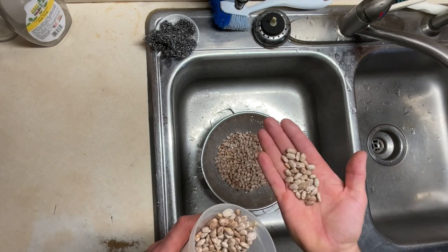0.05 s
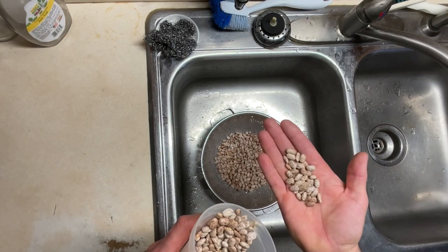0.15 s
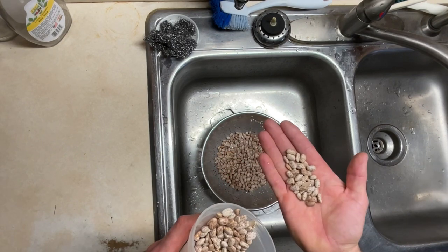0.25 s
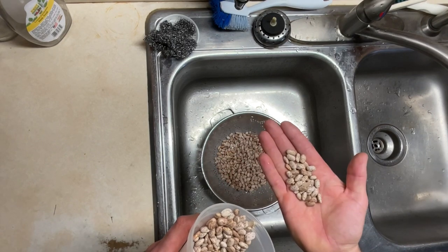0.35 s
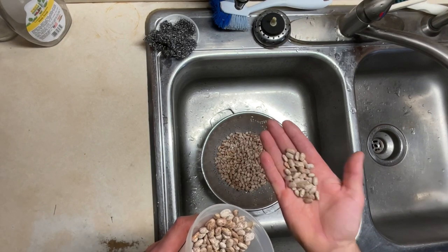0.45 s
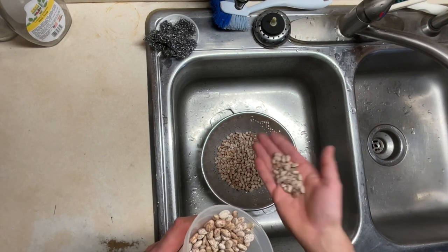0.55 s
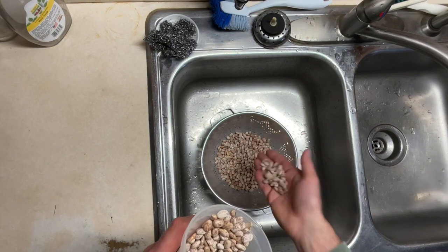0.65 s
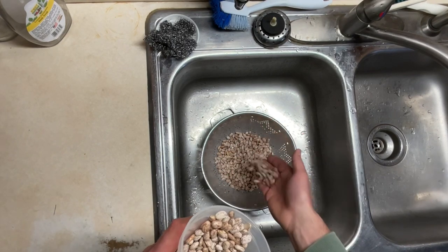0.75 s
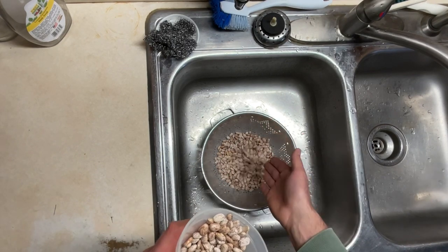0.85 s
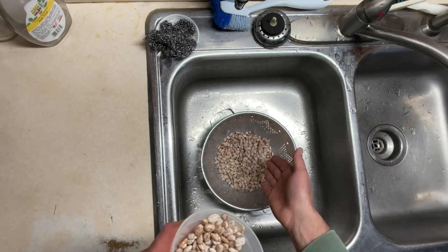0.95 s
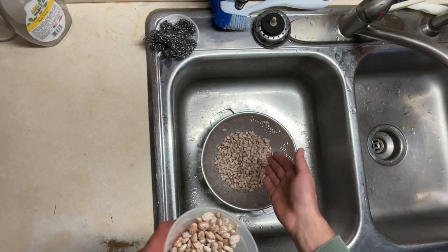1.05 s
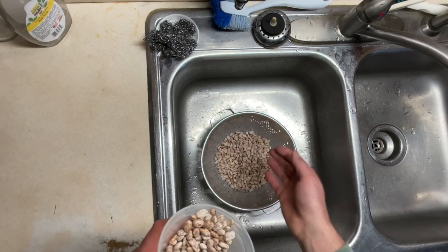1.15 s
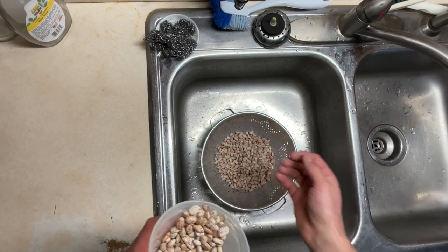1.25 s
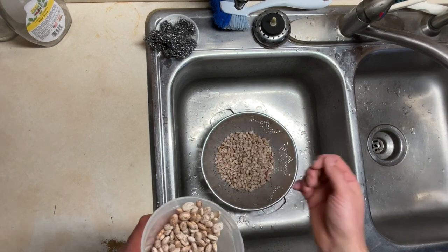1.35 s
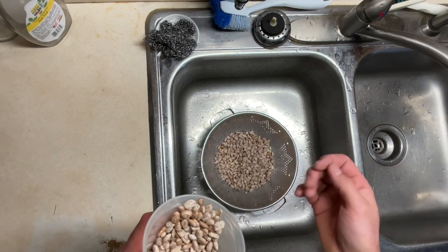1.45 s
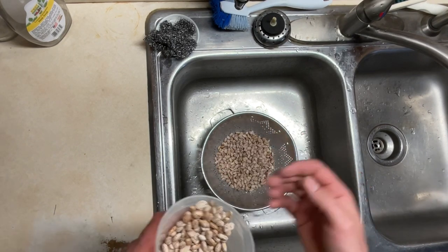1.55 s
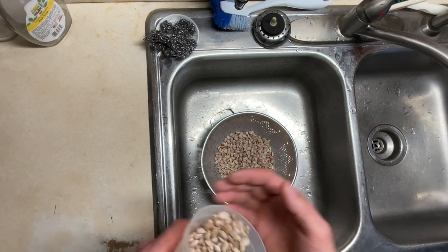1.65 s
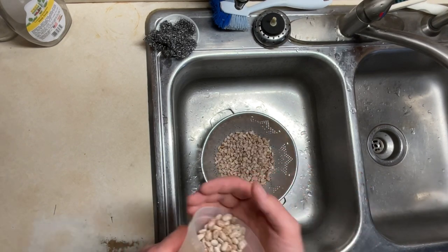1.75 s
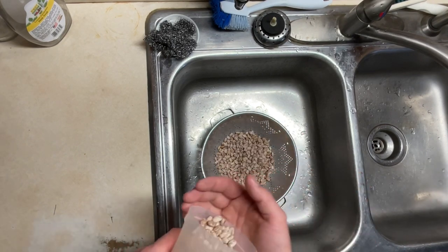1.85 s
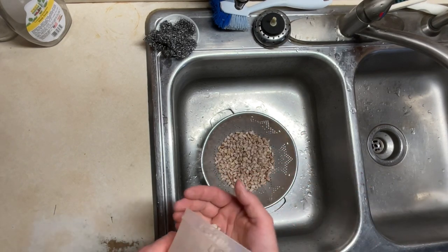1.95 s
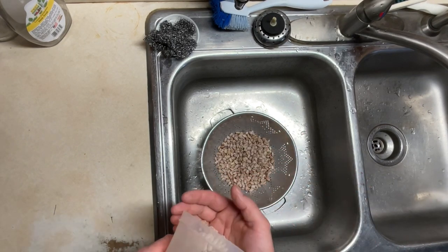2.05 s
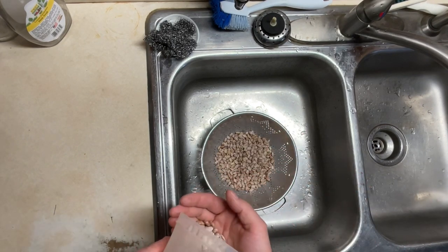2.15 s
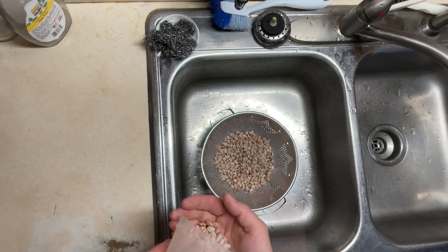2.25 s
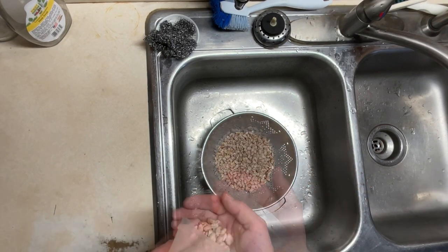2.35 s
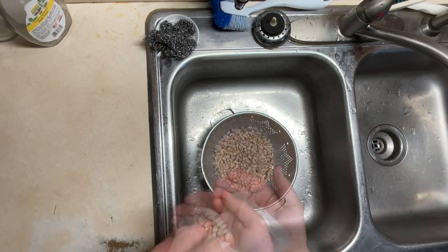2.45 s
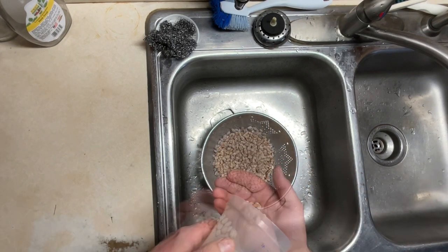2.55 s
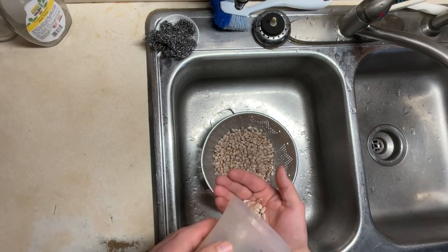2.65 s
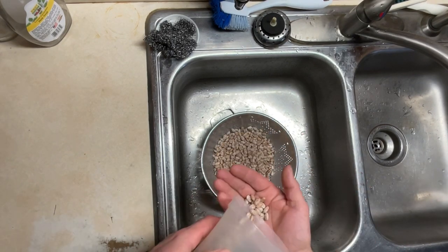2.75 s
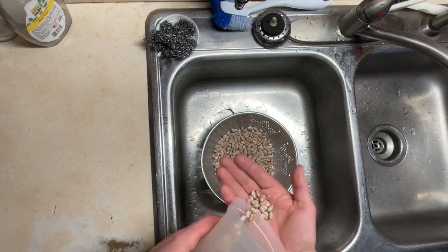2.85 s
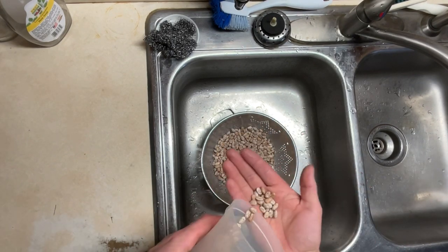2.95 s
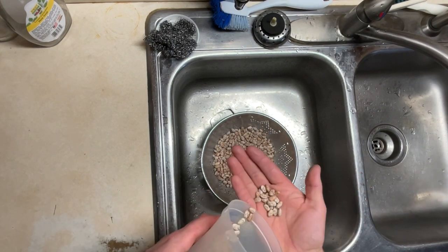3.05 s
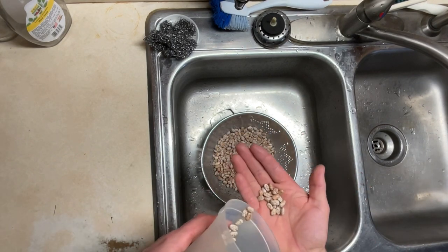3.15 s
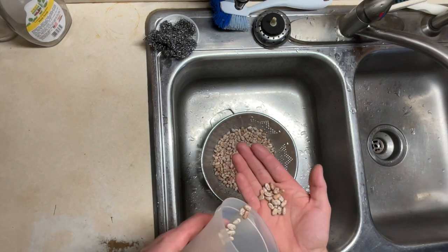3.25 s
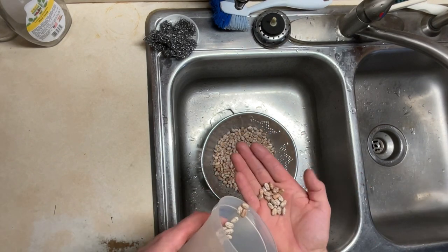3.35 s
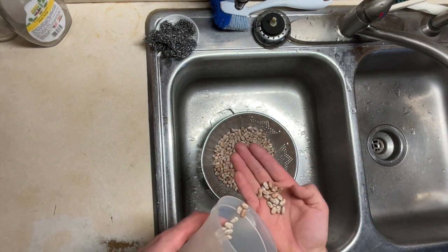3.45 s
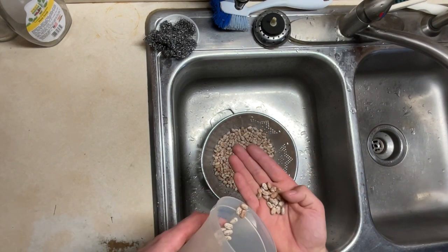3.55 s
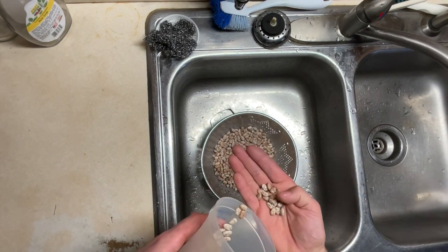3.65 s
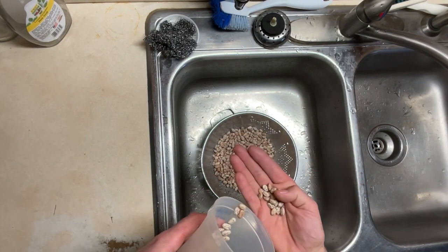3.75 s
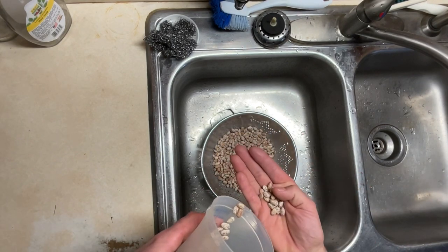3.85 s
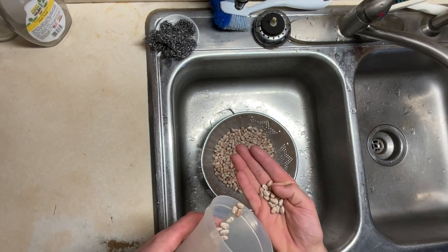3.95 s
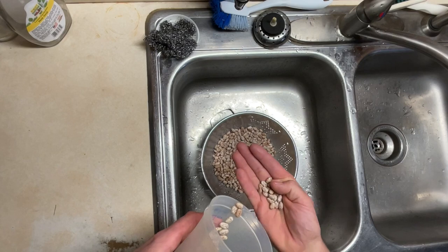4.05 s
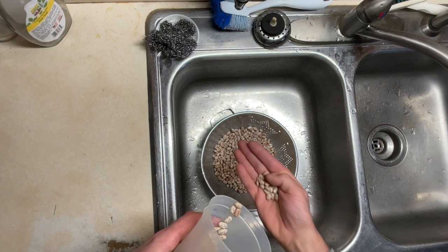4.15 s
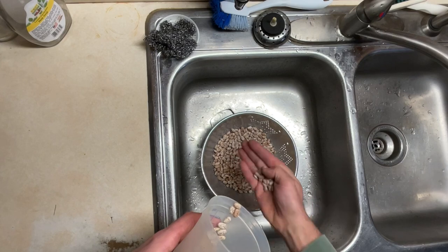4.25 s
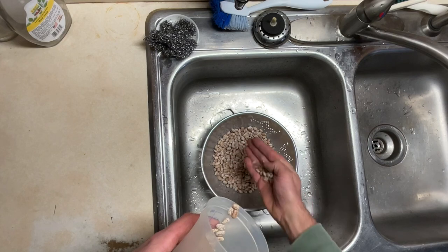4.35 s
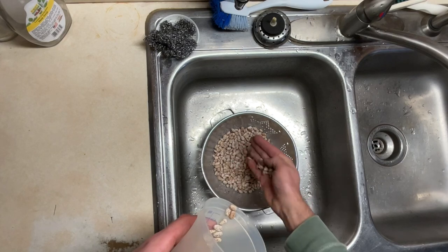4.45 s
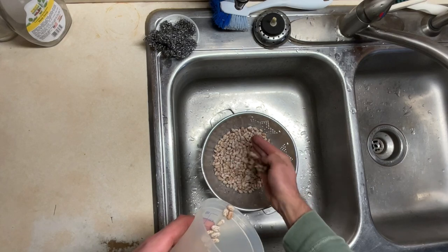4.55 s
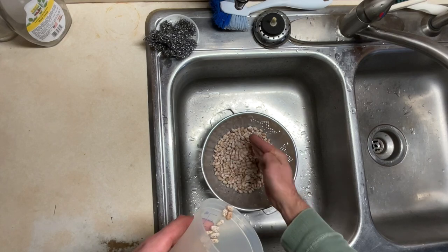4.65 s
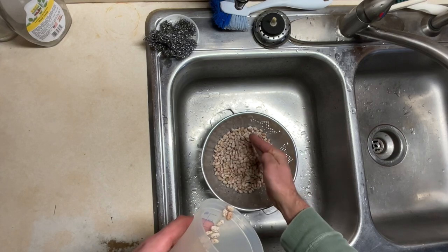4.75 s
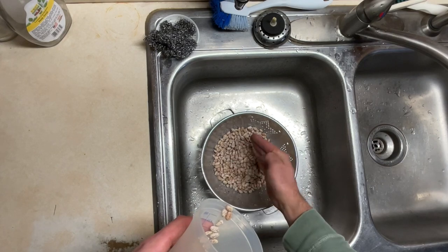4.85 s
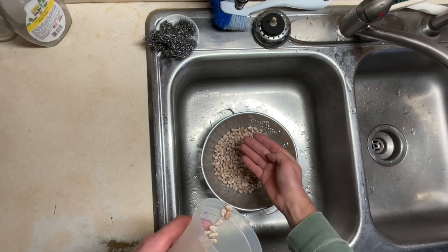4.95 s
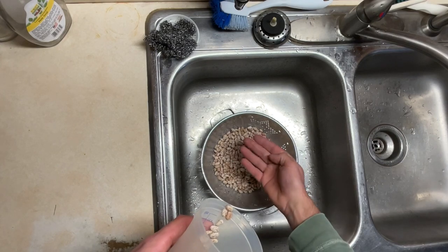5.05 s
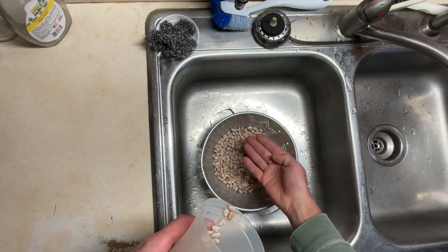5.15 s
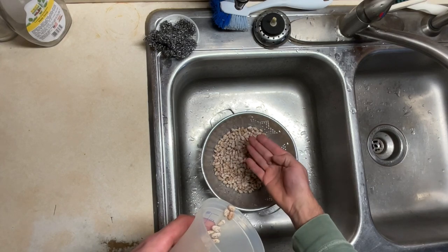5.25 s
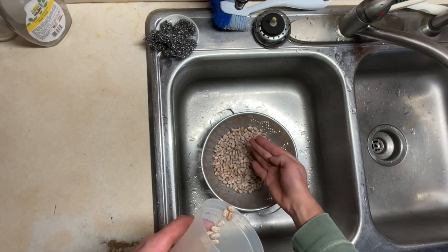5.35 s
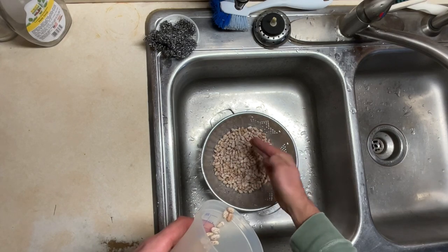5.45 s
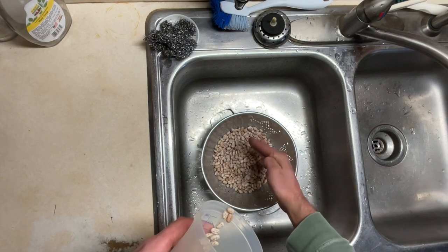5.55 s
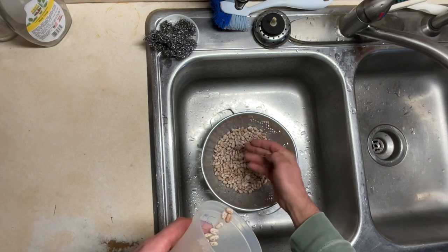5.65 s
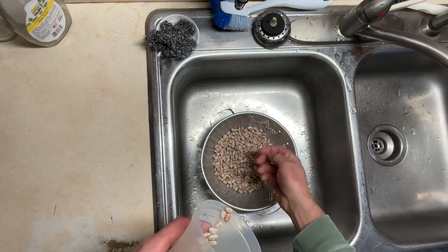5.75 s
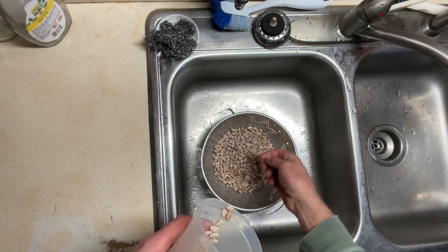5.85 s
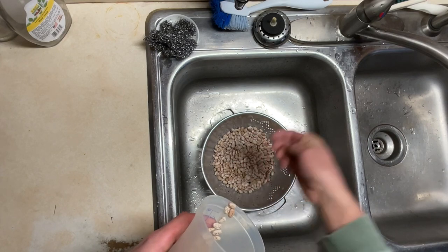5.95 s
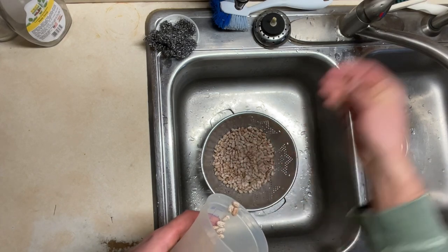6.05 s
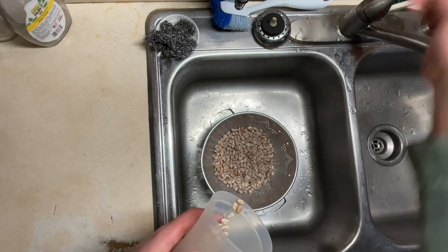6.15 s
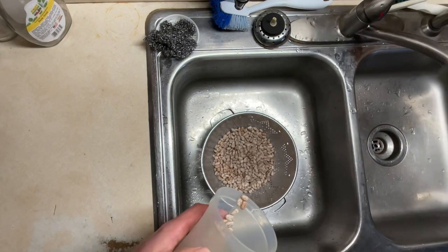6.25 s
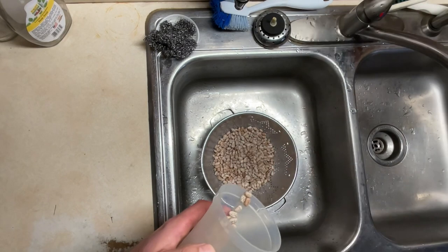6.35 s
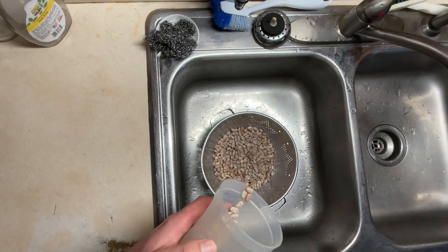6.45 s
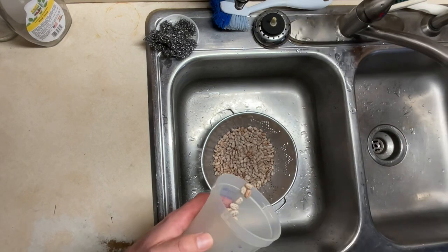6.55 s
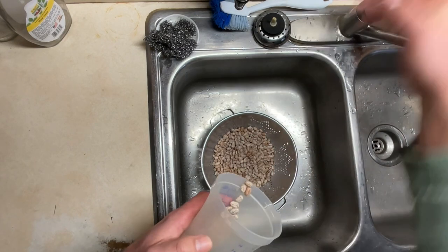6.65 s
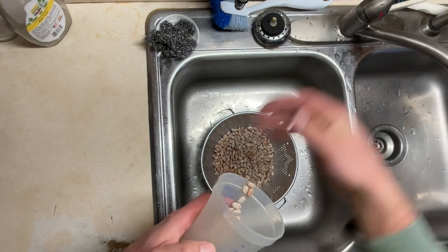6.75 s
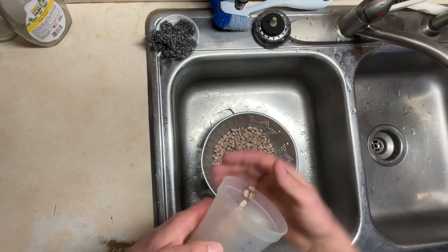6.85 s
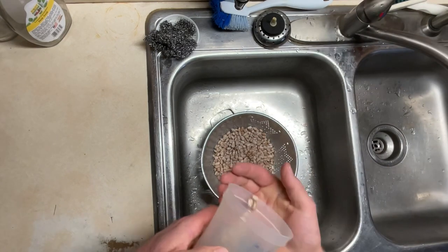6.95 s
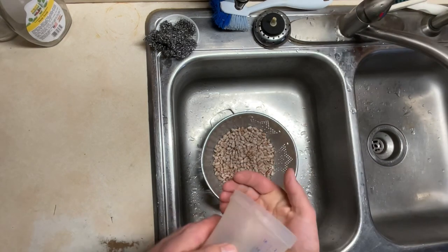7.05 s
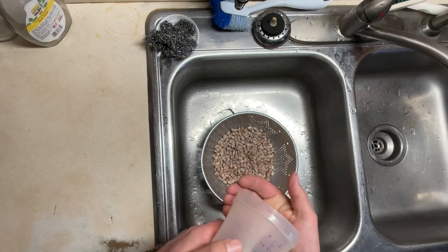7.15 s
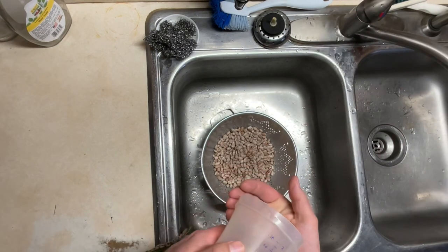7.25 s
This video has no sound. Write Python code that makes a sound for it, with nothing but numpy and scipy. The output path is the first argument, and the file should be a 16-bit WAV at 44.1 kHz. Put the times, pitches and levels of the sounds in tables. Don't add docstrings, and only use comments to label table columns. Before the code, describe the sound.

A close stereo kitchen scene with a quiet, low fridge hum, faint fan tone and nearly inaudible tap drips throughout. After about half a second, the first dry beans tick down, swelling by 0.8 to 0.95 s into a loud, bright clatter on beans and metal colander, with thin rim ringing and a dull boom from the steel sink. Single sharp clicks thin out by 1.2 s. From 1.6 to 2.8 s beans slide and tick more softly against a plastic tub and palm, slightly muffled, then clearer. A near-quiet stretch holds faint finger rubs around 3.8 and 4.1 s. At 4.5 to 4.8 s a smaller, softer handful patters into the colander; stray ticks follow near 5.5 s. Around 6.2 s the tub is rubbed, with a low bump and sharp hollow rap near 6.45 s, then light bean ticks and dull handling until about 7.3 s.

```python
import sys
import numpy as np
from scipy import signal
from scipy.fft import rfft, irfft
from scipy.io import wavfile

SR = 44100
rng = np.random.default_rng(int(sys.argv[2]) if len(sys.argv) > 2 else 0)


def transcribe(signal):
    frames = np.atleast_2d(signal).T
    limited = np.clip(frames, -1, 1)
    pcm = np.round(limited * 32767).astype(np.int16)
    wavfile.write(sys.argv[1], SR, pcm)


def nominal_scale(level):
    x = np.asarray(level, float) / 20
    return 10 ** x


N = 321489

# start in s, peak in dB, tick pitch in Hz,
# sink boom relative to the tick in dB.
FIRST_DROP = [(.5296, -60.5, 5270, -6), (.5746, -52.5, 8750, -9), (.615, -35.5, 10900, -34),
              (.64, -43, 9060, -30), (.6866, -38, 11300, -29), (.705, -36, 8200, -36),
              (.7577, -35, 11100, 0), (.7712, -28, 10600, -13), (.7792, -27, 8960, -12),
              (.7902, -21, 11300, -10), (.799, -25, 8000, -12), (.8077, -19, 12300, -14),
              (.82, -26, 9000, -10), (.8373, -17, 8680, -12), (.8455, -26, 7000, -16),
              (.854, -27, 6000, -14), (.8637, -20, 11200, -19), (.872, -25, 5000, -18),
              (.8805, -16, 7400, -19.5), (.887, -25, 7500, -25), (.8945, -10.5, 6790, -22),
              (.9084, -8.5, 7290, -32.5), (.918, -24, 6500, -30), (.926, -23, 11000, -30),
              (.9327, -9, 6700, -33.5), (.9335, -20, 12000, -30), (.942, -21, 6300, -30),
              (.965, -31, 8000, -20), (.9737, -24, 7710, -19), (1.0011, -13, 7400, -26),
              (1.0521, -15.5, 7480, -40), (1.096, -11.5, 7630, -41.5), (1.1755, -36, 7430, -17)]
SECOND_DROP = [(4.4668, -58, 2980, -4), (4.4938, -41, 9100, -3.5), (4.5013, -41, 9100, -10),
               (4.5135, -27, 10040, -7), (4.53, -36, 8000, -8), (4.545, -40, 8500, -5),
               (4.573, -23, 11300, -8), (4.588, -32, 6500, -8), (4.5984, -31, 6620, -19),
               (4.6194, -27, 7450, -31), (4.633, -27, 7000, -12), (4.6538, -26, 6840, -9),
               (4.662, -30, 6500, -12), (4.68, -32, 6500, -10), (4.7173, -40, 7100, -8),
               (4.7386, -30.5, 11000, -5), (4.7992, -47.5, 6400, 3.5), (4.9186, -57.5, 3100, 6.5),
               (5.527, -36, 11500, 6), (5.624, -36, 11500, -5), (5.696, -53.5, 5870, 0)]
# start in s, peak in dB, tick pitch in Hz,
# wall knock relative to the tick in dB.
POUR = [(1.8769, -47, 5560, -5), (1.885, -42, 5000, -3), (1.927, -33, 7070, -8), (2.0127, -45, 6260, 4.5),
        (2.0325, -33, 5910, -27), (2.085, -27, 6530, -11.5), (2.1474, -40, 6540, -24),
        (2.1581, -32, 6200, -11), (2.1986, -42, 2150, -18.5), (2.289, -42, 7500, -10),
        (2.3145, -43.5, 6530, -10), (2.3724, -43, 9010, -23), (2.397, -42, 7000, -23),
        (2.4276, -38, 5900, -9), (2.4547, -38, 9400, -14), (2.4986, -39, 6140, -10),
        (2.53, -33.5, 7470, -6), (2.547, -38, 9000, -8), (2.566, -40, 6000, -12), (2.5835, -32, 6240, -24),
        (2.6195, -36, 6660, -13), (2.6864, -44, 4450, -13), (2.7235, -54, 2190, -17),
        (2.746, -48, 7400, -16), (2.7819, -59, 3300, -16.5), (2.8992, -58, 2170, -4),
        (2.9236, -54.5, 2224, -9), (2.986, -55, 3010, -23)]
FINGERING = [(1.5677, -59, 7180, -10), (1.5971, -65, 4600, -14.5), (1.656, -60, 5850, -12),
             (1.6684, -58.5, 6050, -15.5), (1.6939, -52, 5510, -11.5), (1.7274, -47.5, 5600, -23),
             (1.8061, -63.5, 3330, -15.5), (3.6931, -62, 4060, -13), (3.8104, -63, 7770, 8),
             (3.8193, -62, 2700, 6), (4.1226, -55, 2930, 10), (4.137, -53, 2000, 8),
             (4.1431, -50, 3590, -6), (4.298, -52, 7710, -23.5), (4.39, -71, 2010, -8),
             (4.4165, -60, 9140, -17.5)]
REFILL = [(6.1961, -48, 2180, -8), (6.4171, -52, 2170, 4), (6.4705, -28, 4200, -9),
          (6.6112, -53, 9180, -14.5), (6.6406, -58, 2850, 0), (6.894, -62, 6310, -4),
          (6.927, -58, 2220, -10.5), (6.9369, -48, 5780, -25.5), (6.9918, -64, 2510, -15),
          (7.1754, -56, 7010, -16), (7.2018, -53, 3490, -24), (7.2642, -50, 3290, -6)]
# peak time in s, peak in dB, rise in s per 30 dB,
# fall in s per 30 dB, brightness in dB per octave.
TUMBLES = [(.575, -60, .035, .6, 16), (.72, -47, .17, .2, 22), (.795, -31, .08, .4, 8),
           (.84, -26, .012, .3, 3), (.9, -24, .2, .16, 7), (1.12, -35.5, .3, .17, 10),
           (1.33, -70, .2, .3, 5), (4.497, -47, .008, .09, 6), (4.52, -42, .01, .08, 8),
           (4.64, -29, .14, .13, 11), (4.76, -48, .04, .15, -2), (4.918, -65, .01, .1, 5),
           (5.528, -49, .008, .1, 0), (5.626, -50, .008, .1, 3), (5.7, -62, .03, .12, 1)]
# pitch in Hz, level in dB, t60 in s.
SINK_MODES = [(199, 3, 0.25), (250, -3, 0.11), (340, -4, .06), (424, 1, 0.08), (520, -4, .05),
              (604, -7, .05), (744, -18, 0.2), (1032, -14, 0.11)]
TUB_MODES = [(1120, -6, 0.018), (1500, 3, 0.011), (1907, -1.5, 0.019), (2206, -8, .02), (3500, -4, 0.009)]
COLANDER_MODES = [(1800, -9, .05), (2170, -8, .04), (3220, -8, .04), (4000, -3, .05), (4204, -5, .04),
                  (4930, -7, .04), (6240, 2, .07), (6490, 5, .07), (6660, 5, .06), (6850, 3, .06),
                  (7430, -3, .05), (7600, -2, .05), (8150, 1, .05), (11340, -4, .04)]


def rms_one(x):
    return x / np.sqrt(np.mean(x ** 2) + 1e-20)


def at_hz(points, hz):
    point_hz, value = np.array(points).T
    return np.interp(np.log(hz), np.log(point_hz), value)


def band(x, order, hz, kind):
    return signal.sosfilt(signal.butter(order, hz, kind, fs=SR, output="sos"), x)


def resonance(x, hz, width_hz):
    return signal.lfilter(*signal.iirpeak(hz, hz / width_hz, fs=SR), x)


def dips(x, rows):
    for hz, width_hz, db in rows:
        x = x - (1 - nominal_scale(db)) * resonance(x, hz, width_hz)
    return x


def ring(clicks, hz, t60):
    decay, turn = nominal_scale(-60 / (t60 * SR)), 2 * np.pi * hz / SR
    return signal.lfilter([0, np.sin(turn)], [1, -2 * decay * np.cos(turn), decay * decay], clicks + 1e-18)


def struck(rows, modes, spread_db):
    rows, out = np.array(rows), np.zeros(N)
    starts = (rows[:, 0] * SR).astype(int)
    luck = rng.normal(0, 1, (len(rows), len(modes)))
    for k, (hz, level_db, t60) in enumerate(modes):
        clicks = np.zeros(N)
        clicks[starts] = nominal_scale(rows[:, 1] + level_db + spread_db * luck[:, k])
        out += ring(clicks, hz, t60)
    return out


def diffuse(x, t60, onset_s):
    t = np.arange(int(t60 * SR)) / SR
    cloud = rng.standard_normal((2, len(t))) * nominal_scale(-60 * t / t60) * (1 - np.exp(-t / onset_s))
    cloud /= np.sqrt(np.sum(cloud ** 2, axis=1, keepdims=True))
    return signal.fftconvolve(np.broadcast_to(x, (2, N)), cloud, axes=1)[:, :N]


def contacts(per_s, spread_db):
    sizes = nominal_scale(spread_db * np.minimum(rng.exponential(1, N), 4)) * rng.choice([-1, 1], (2, N))
    return sizes * (rng.random(N) < per_s / SR)


def swells(rows, weights=1):
    t = np.arange(0, N + 64, 64) / SR
    peak_s, peak_db, rise, fall = np.array(rows).T[:4, :, None]
    slopes = np.where(t < peak_s, (peak_s - t) / rise, (t - peak_s) / fall)
    power = nominal_scale(2 * (peak_db - 30 * slopes))
    total = np.sum(power * np.reshape(weights, (-1, 1)), axis=0)
    return np.interp(np.arange(N) / SR, t, total + 1e-14)


def ticks(rows, octaves, t60, skirt_db, shared, pan_db, crack_db):
    far_ear_lag, pan_spread_db = 21, 1.5
    length = 4000
    out, t = np.zeros((2, N + length)), np.arange(length) / SR
    shape = nominal_scale(-60 * t / t60) * (1 - np.exp(-t / 0.00021))
    for s, peak_db, hz, _ in rows:
        left, right, both = rng.standard_normal((3, length)) * shape
        side_db = pan_db + pan_spread_db * rng.standard_normal()
        smear = np.array([left + shared * both, right + shared * np.roll(both, far_ear_lag)])
        edges = np.clip(hz * 2. ** np.array([-octaves, octaves]), 500, .45 * SR)
        core = band(smear, 3, edges, "band")
        burst = core / np.abs(core.mean(axis=0)).max()
        burst += nominal_scale(skirt_db) * band(smear * shape ** 3, 2, 8500, "high")
        burst += nominal_scale(crack_db) * band(smear * shape ** 2, 2, [1900, 5500], "band")
        i = int(s * SR)
        out[:, i:i + length] += burst * nominal_scale(peak_db + 2.5 + np.array([[side_db], [-side_db]]) / 2)
    return out[:, :N]


def colander():
    rows = np.concatenate([FIRST_DROP, SECOND_DROP])
    tick = ticks(rows, octaves=0.27, t60=.036, skirt_db=-5, shared=1.7, pan_db=0.6, crack_db=-18)
    rim = struck(rows[:, :2] + [0, -24], COLANDER_MODES, spread_db=4.0)
    boom = struck(np.c_[rows[:, 0], rows[:, 1] + rows[:, 3] - 8], SINK_MODES, spread_db=1.5)
    return tick + diffuse(rim, t60=.012, onset_s=.0005) + boom


def rumble():
    # peak time in s, peak in dB, rise and fall in s per 30 dB.
    shakes = [(.764, -29.5, .012, .5), (.88, -30, .15, .24), (4.497, -39, .01, .15), (4.515, -38, .02, .2),
              (4.58, -37, .02, .3), (4.622, -35, .14, .22), (4.74, -41, .03, .3), (5.53, -40, .01, .25)]
    blows = rms_one(contacts(per_s=280, spread_db=2.5)[0]) * np.sqrt(swells(shakes)) * nominal_scale(-29.5)
    return sum(nominal_scale(db) * ring(blows * rng.choice([-1, 1], N), hz, t60 * .5) for hz, db, t60 in SINK_MODES)


def steel_sink():
    sink = band(colander() + rumble(), 2, 150, "high")
    flank = band(sink.mean(axis=0), 2, [330, 1300], "band")
    return sink + nominal_scale(-5) * np.roll(flank, 4) * [[1], [-1]]


def mesh():
    taps = rms_one(contacts(per_s=500, spread_db=3.0)) * np.sqrt(swells(TUMBLES))
    taps = taps + .7 * taps[::-1]
    rung = sum(nominal_scale(db) * ring(taps * rng.choice([-1, 1], N), hz, t60) for hz, db, t60 in COLANDER_MODES)
    return nominal_scale(-44) * rung


def crowd_rows(crowd, beans, wall_db, muffle_db, stir_db, bright_db):
    wall_per_bright = -.8
    rows = [(*row, wall_db + wall_per_bright * row[-1], muffle_db) for row in crowd]
    stir_rise_s, stir_fall_s, stir_wall_db = .004, .07, -22
    for s, db, _, _ in beans:
        rows.append((s, db + stir_db, stir_rise_s, stir_fall_s, bright_db, stir_wall_db, muffle_db))
    return rows


def patter(rows):
    # frequency in Hz, level in dB per Hz.
    grain_spectrum = [(1180, -33), (2000, 9.5), (2910, -7), (5990, -1), (7770, -6), (11900, -15.5),
                      (13700, -26), (16000, -31.5)]
    rows = np.array(rows)
    power = swells(rows)
    bright_db = swells(rows, rows[:, 4]) / power
    muffle_db = swells(rows, rows[:, 6]) / power
    clicks = contacts(per_s=4000, spread_db=3.2)
    pitches = np.geomspace(2500, 12500, 12)
    dealt = rng.integers(0, 12, (2, N))
    plain, tinted = 0, 0
    for k, hz in enumerate(pitches):
        own_clicks = np.diff(clicks * (dealt == k), prepend=0)
        part = nominal_scale(at_hz(grain_spectrum, hz)) * ring(own_clicks, hz, 16. / hz)
        plain = plain + part
        tinted = tinted + part * nominal_scale(bright_db * np.log2(hz / 6000) + muffle_db * (hz > 7000))
    grains = nominal_scale(-4) / np.std(plain) * np.sqrt(power) * tinted
    knocks = contacts(per_s=2500, spread_db=2.2)
    wall = rms_one(sum(nominal_scale(db) * ring(knocks, hz, t60 * 0.47) for hz, db, t60 in TUB_MODES))
    wall = wall * np.sqrt(swells(rows, nominal_scale(2 * rows[:, 5])))
    return grains + wall * nominal_scale([[1.5], [-1.5]])


def bed_patter():
    beans = [*FIRST_DROP, *SECOND_DROP]
    return patter(crowd_rows(TUMBLES, beans, wall_db=-10, muffle_db=1.5, stir_db=-14, bright_db=12))


def tub():
    # start in s, peak in dB.
    rap = [(6.4712, -30)]
    # pitch in Hz, level in dB, t60 in s.
    empty_modes = [(1550, -5, .05), (2500, -2, .01), (4000, 0, .012), (5350, -10, .1), (5500, -2, .02),
                   (5750, -13, .1)]
    rows = np.concatenate([POUR, FINGERING, REFILL])
    tick = ticks(rows, octaves=0.6, t60=0.016, skirt_db=-19, shared=1.3, pan_db=4.5, crack_db=-21)
    wall = struck(np.c_[rows[:, 0], rows[:, 1] + rows[:, 3] - 8], TUB_MODES, spread_db=4.0)
    wall = wall + struck(rap, empty_modes, spread_db=.6)
    return tick + diffuse(wall, t60=.012, onset_s=0.00062)


def held_patter():
    # peak time in s, peak in dB,
    # rise in s per 30 dB, fall in s per 30 dB, brightness in dB per octave.
    slides = [(1.58, -73, .2, .5, 8), (1.706, -46, .06, .1, 0), (1.934, -50, .13, .5, 1),
              (2.08, -47, .4, .2, -2), (2.166, -44.5, .15, .15, -3), (2.31, -51, .3, .3, 1),
              (2.4, -47, .1, .5, 2), (2.52, -46, .2, .4, 16), (2.57, -41, .5, .16, 5),
              (2.7, -52, .05, .1, 12), (2.8, -66, .15, .12, -10), (2.69, -50, .1, .13, 4),
              (2.922, -68, .07, .13, -3.5), (2.985, -66, .02, .13, -10), (3.708, -60.5, .035, .14, -5),
              (4.06, -70, .03, .4, 0), (4.144, -50, .05, .26, -2), (4.3, -68, .03, .04, 5),
              (6.936, -58, .11, .07, -5), (7.18, -56, .03, .3, 2), (7.27, -52, .3, .4, -2)]
    squeezes = [(3.822, -63.5, .04, .2, -2), (4.42, -74, .2, .1, 0), (6.21, -54, .03, .22, -3),
                (6.432, -60.5, .03, .2, -6), (6.49, -53, .03, .25, -1), (7.078, -62, .15, .25, -1),
                (6.67, -70, .04, .1, -6)]
    floor = crowd_rows(slides, POUR, wall_db=-9.5, muffle_db=-8, stir_db=-10, bright_db=-1)
    beans = [*FINGERING, *REFILL]
    hand = crowd_rows(squeezes, beans, wall_db=3, muffle_db=-14, stir_db=-12, bright_db=-3)
    return patter(floor + hand)


def shaded(x):
    opens_s, shade = 2.39, .4
    dull = band(x, 4, 12000, "low")
    t = np.arange(N) / SR
    shut = np.clip((opens_s - t) / .03, 0, 1) * shade
    return x + shut * (dull - x)


def rubbing():
    # peak time in s, peak in dB, rise in s per 30 dB, fall in s per 30 dB, wall note in Hz.
    rubs = [
        (3.822, -53, .03, .14, 1540),
        (4.14, -52.5, .05, .25, 1590),
        (6.21, -51, .04, .2, 1930),
    ]
    # ratio to the wall note, level in dB.
    partials = [(1., 0), (1.45, -12), (2.28, -11)]
    slips = rms_one(contacts(per_s=1500, spread_db=2.5))
    out = 0
    for row in rubs:
        note = sum(nominal_scale(db) * ring(slips, row[-1] * ratio, t60=.011) for ratio, db in partials)
        out = out + np.sqrt(swells([row])) * rms_one(note)
    return out


def handling():
    # peak time in s, peak in dB, rise and fall in s per 30 dB.
    grip = [(4.122, -58, .04, .17), (6.204, -55, .09, .25), (6.438, -45.5, .05, .1), (7.09, -47, .19, .15),
            (7.29, -54.5, .3, .2)]
    # start in s, peak in dB.
    bumps = [
        (.86, -27.5),
        (4.135, -38),
        (6.42, -28.5),
        (6.47, -32.5),
        (7.07, -36),
    ]
    # pitch in Hz, level in dB, t60 in s.
    counter_modes = [(88, -2, .15), (135, -4, 0.051), (281, -3, 0.16), (440.4, -6.5, .06)]
    slips = contacts(per_s=900, spread_db=2.0)
    dull = band(slips + .8 * slips[::-1], 2, [250, 900], "band")
    creak = rms_one(dull) * np.sqrt(swells(grip)) * nominal_scale(-2.5)
    return creak + struck(bumps, counter_modes, spread_db=0.5) / 3


def drips():
    # start in s, peak in dB.
    drops = [(.028, -77), (.55, -77), (1.534, -78), (3.07, -80), (3.53, -77), (4.06, -78), (5.047, -77),
             (5.496, -78), (6.03, -77)]
    # pitch in Hz, level in dB, length in s.
    tones = [(2600, 0, .036), (1440, 6, .055)]
    out = np.zeros((2, N))
    for s, peak_db in drops:
        for hz, db, length in tones:
            t, i = np.arange(int(length * SR)) / SR, int(s * SR)
            wobble = np.cumsum(rng.normal(0, .03, (2, len(t))), axis=1)
            tone = np.sqrt(np.hanning(len(t))) * np.sin(2 * np.pi * hz * t + wobble)
            out[:, i:i + len(t)] += nominal_scale(peak_db + db + 4) * tone
    return out


def fan():
    # pitch in Hz, width in Hz, level in dB rms.
    whine = [(614, 25, -71.5), (1185, 64, -75)]
    noise = rng.standard_normal((2, N))
    return sum(nominal_scale(db + 2.5) * rms_one(resonance(noise, hz, width_hz)) for hz, width_hz, db in whine)


def room_noise():
    # frequency in Hz, level in dB per Hz.
    air_spectrum = [(18, -44.5), (30, -19), (49, -15), (134, -1.5), (165, -7), (197, -3), (223, -11.5),
                    (288, -9), (411, -12.5), (443, -15), (858, -20), (1600, -32.5), (2250, -44),
                    (2560, -61), (2900, -55.5), (6500, -50), (13000, -46.5)]
    # frequency in Hz, likeness from -1 to 1.
    likeness = [(60, 0.66), (180, 1), (550, -0.62), (1650, -0.36), (4970, -0.76), (15000, -0.27)]
    # pitch in Hz, level in dB rms.
    hum = [(59.3, -57), (89, -60), (199, -66)]
    hz = np.maximum(np.fft.rfftfreq(N, 1 / SR), 1)
    alike = np.clip(at_hz(likeness, hz), -1, 1)
    mid, side = rfft(rng.standard_normal((2, N))) * nominal_scale(at_hz(air_spectrum, hz))
    air = irfft(np.sqrt(1 + alike) * mid + np.sqrt(1 - alike) * side * [[1], [-1]], N)
    t = np.arange(N) / SR
    motor = 0
    for line_hz, db in hum:
        waver = np.cumsum(rng.standard_normal(N)) * .004
        motor = motor + np.sqrt(2) * nominal_scale(db) * np.sin(2 * np.pi * line_hz * t + waver)
    return nominal_scale(-50.5 - 3.5) * rms_one(air) + motor


def scene():
    # frequency in Hz, width in Hz, level in dB.
    basin_dips = [(1450, 180, -6), (2000, 150, -10), (2750, 220, -12), (3450, 160, -7)]
    in_sink = dips(steel_sink() + bed_patter() + mesh(), basin_dips)
    in_hand = shaded(tub() + held_patter())
    near = in_sink + in_hand + handling() + rubbing()
    tail = nominal_scale(-14) * diffuse(band(near, 2, 7000, "low"), t60=.26, onset_s=.008)
    return near + tail + drips() + room_noise() + fan()


def roll_off(x):
    return signal.sosfilt(signal.butter(12, 17120, fs=SR, output="sos"), x)


def record(dry):
    # frequency in Hz, width in Hz, level in dB.
    port_dips = [(10120, 900, -21.5), (11600, 1800, 1.5), (13850, 1800, -28), (15550, 3500, -3)]
    x = signal.sosfilt(signal.cheby2(10, 60, 17100, fs=SR, output="sos"), dry)
    x = band(x, 6, 46, "high")
    return roll_off(dips(x, port_dips))


dry = scene()
out = record(dry)
transcribe(out)
```